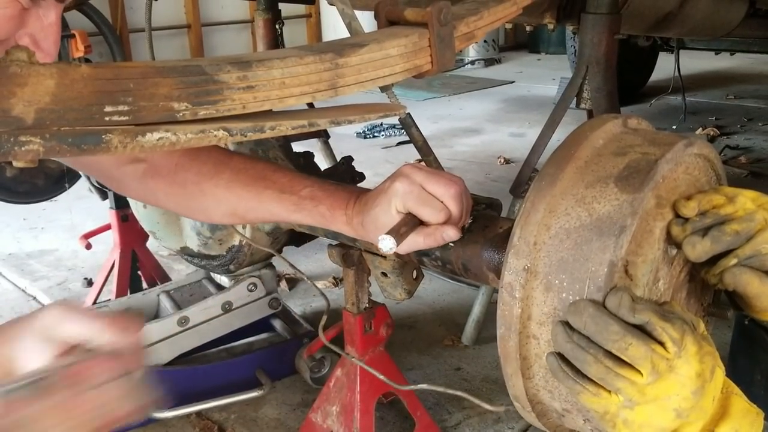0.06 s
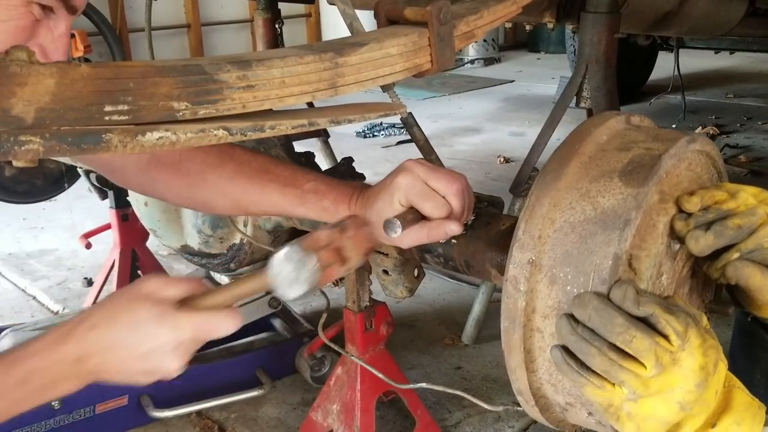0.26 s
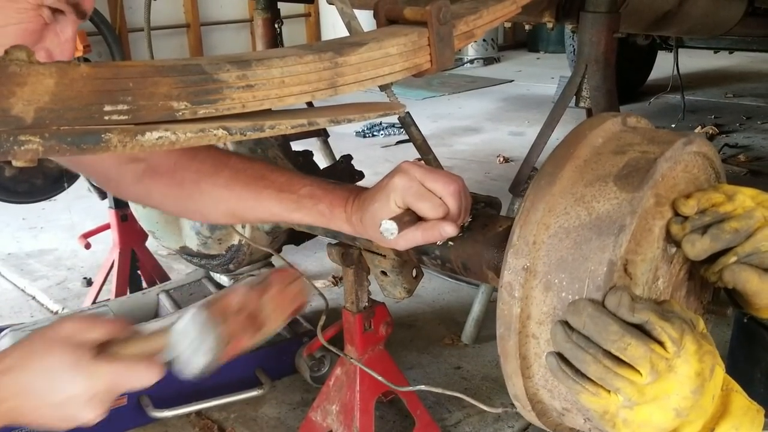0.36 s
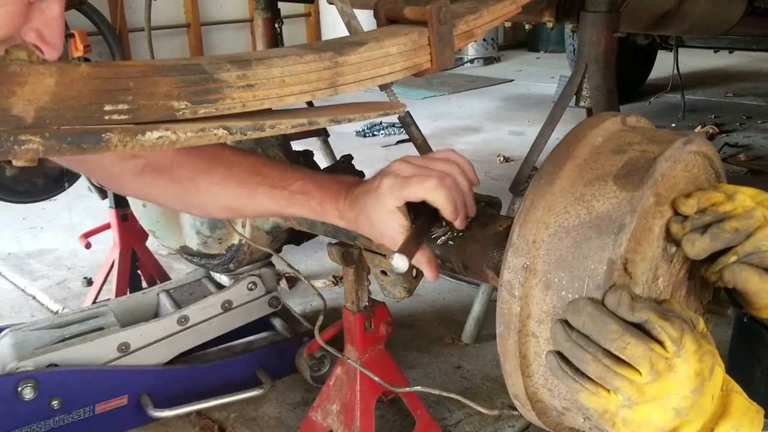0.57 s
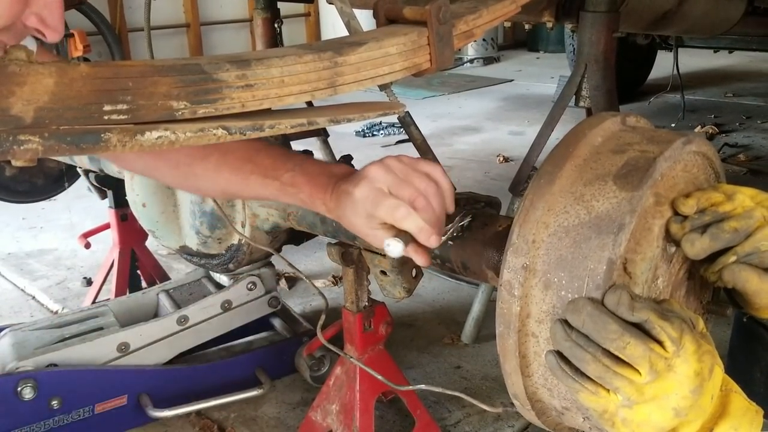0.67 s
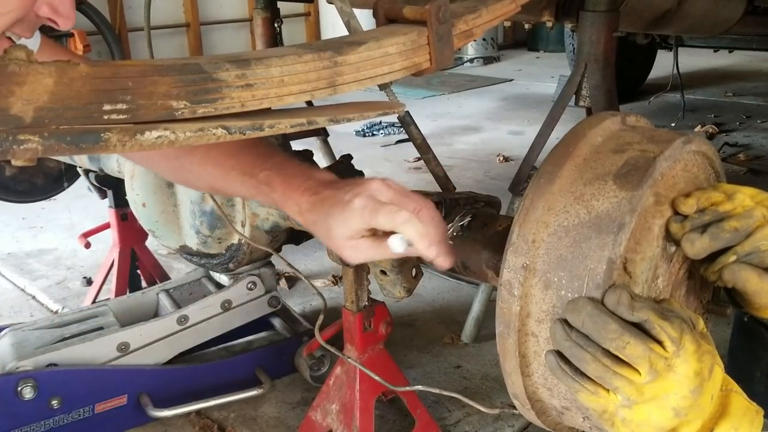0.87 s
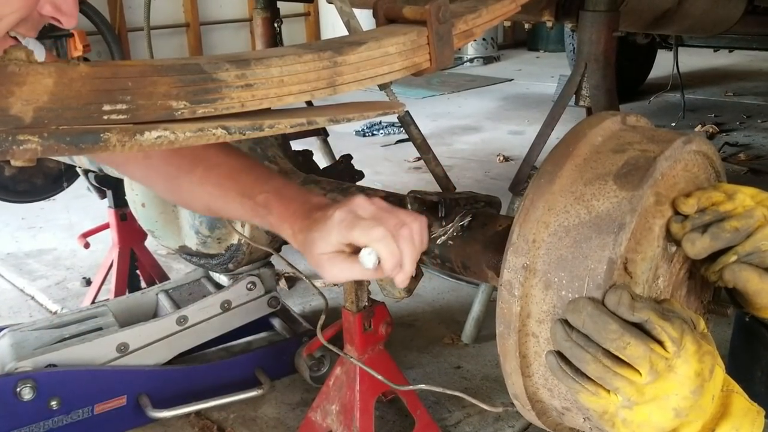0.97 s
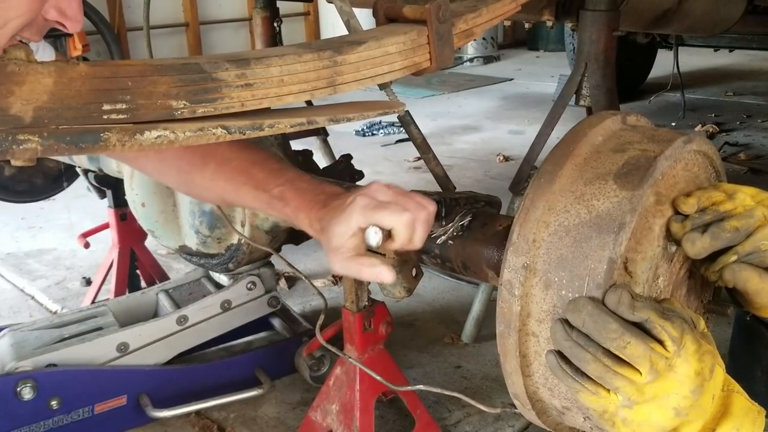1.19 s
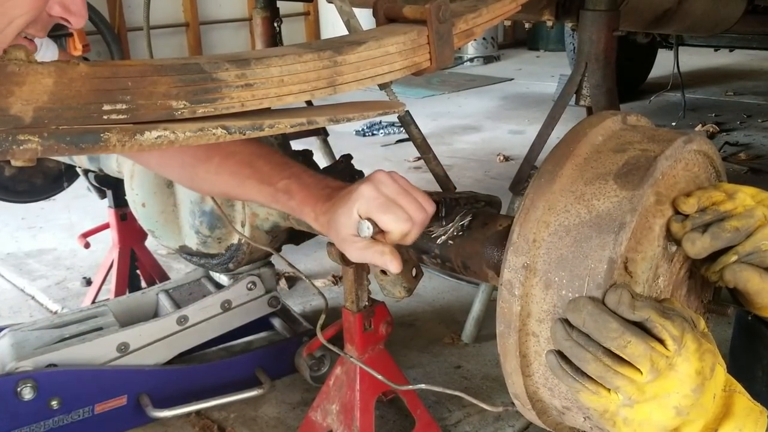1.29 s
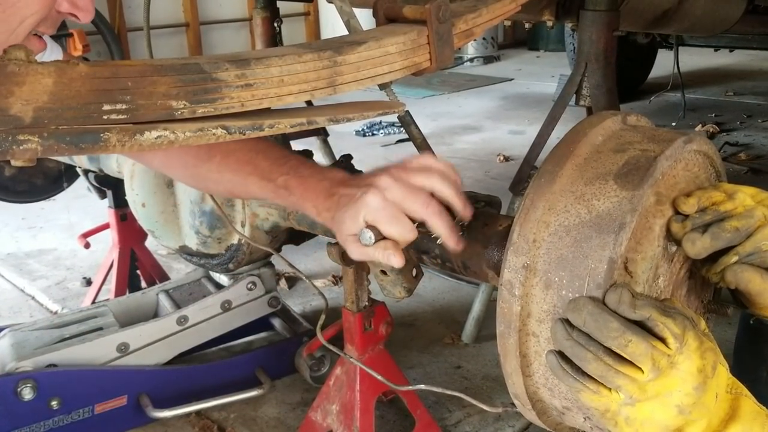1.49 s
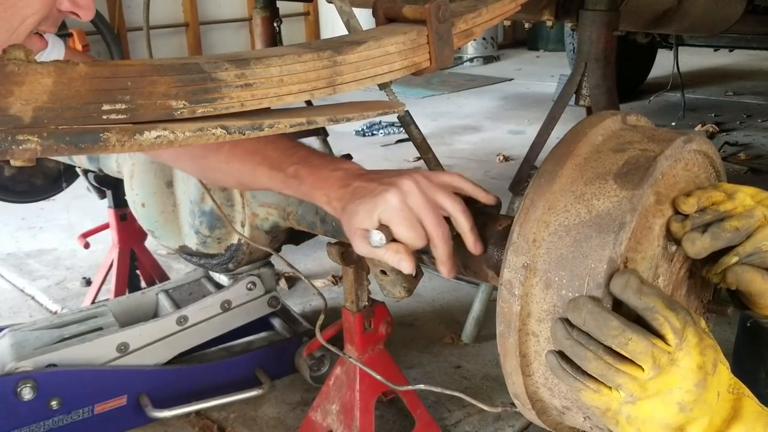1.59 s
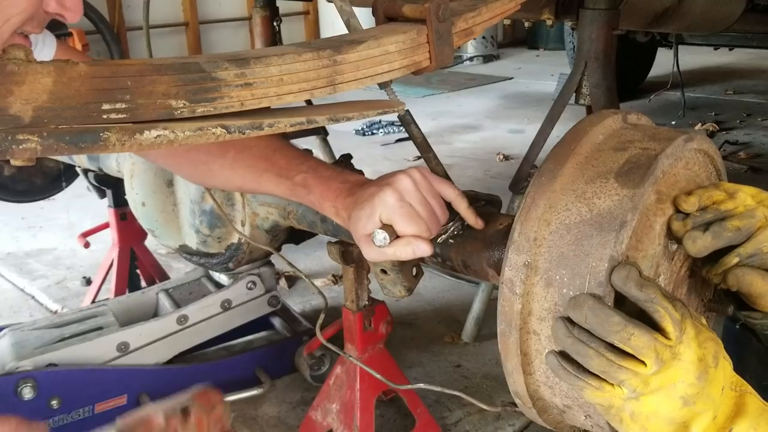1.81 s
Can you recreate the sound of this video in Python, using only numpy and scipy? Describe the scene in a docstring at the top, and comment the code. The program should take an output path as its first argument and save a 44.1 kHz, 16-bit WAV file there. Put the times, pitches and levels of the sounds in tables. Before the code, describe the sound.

A hammer strikes a steel chisel once, a hard bright clang, then light metal knocks follow

```python
"""A quiet garage background of patchy noise rises and falls; the chisel still rings faintly from an earlier blow.
At 0.21 s a hammer drives the chisel hard against a steel axle part: noise cracks and decaying sines, with chatter.
A dense clang of shaped noise dies away; beating sine pairs ring on high and thin until the hand grips the shank.
From 0.68 to 1.32 s the tool is set back in light knocks: short modes, scuffs of noise, choked pings.
Walls and floor answer the steel: single echoes and a dense tail by convolution."""
import sys
import numpy as np
from scipy import signal
from scipy.fft import rfft, irfft
from scipy.io import wavfile
from scipy.ndimage import uniform_filter1d

SR = 44100
rng = np.random.default_rng(int(sys.argv[2]) if len(sys.argv) > 2 else 0)


def gain_from_decibels(decibels):
    """Convert decibel values to linear amplitude factors."""
    exponent = np.asarray(decibels, float) / 20
    return 10 ** exponent


def generate_wav(signal):
    """Clip the signal to [-1, 1] and save it as 16-bit WAV at the path in sys.argv[1]."""
    frames = np.transpose(np.atleast_2d(signal))
    scaled = np.clip(frames, -1, 1) * 32767
    pcm = np.round(scaled).astype(np.int16)
    wavfile.write(sys.argv[1], SR, pcm)


N = 81585
BLOW_S = 0.2108


def evened(x):
    """Scales to rms 1."""
    return x / np.sqrt(np.mean(x ** 2) + 1e-20)


def read(points, hz):
    """Interpolates a table along log frequency."""
    f, value = np.transpose(points)
    return np.interp(np.log(hz + 1), np.log(f + 1), value)


def since(s):
    """Seconds after a moment (0 before it), and a switch that is on from then."""
    t = np.arange(N) / SR - s
    return np.maximum(t, 0), t >= 0


def sides(left_minus_right_db):
    """Left and right gains that split a level difference evenly."""
    return gain_from_decibels([[left_minus_right_db / 2], [-left_minus_right_db / 2]])


def above(x, hz):
    """Third-order high-pass."""
    return signal.sosfilt(signal.butter(3, hz, "high", fs=SR, output="sos"), x)


def ring(s, hz, db, t60, rise_s=0.00087):
    """One mode: an exponentially dying sine with a soft start."""
    t, _ = since(s)
    rise = np.sin(np.pi / 2 * np.minimum(t / rise_s, 1)) ** 2
    return rise * gain_from_decibels(db - 60 * t / t60) * np.sin(2 * np.pi * hz * t)


def burst(s, shape, db, t60):
    """A short puff of coloured noise, half shared between the channels."""
    rise_s = 0.0005
    hz, z = np.fft.rfftfreq(N, 1 / SR), rng.standard_normal((3, N))
    noise = evened(irfft(rfft(z[:2] + z[2]) * gain_from_decibels(read(shape, hz)), N))
    t, on = since(s)
    return noise * on * np.minimum(t / rise_s, 1) * gain_from_decibels(db - 60 * t / t60)


def air():
    """Patchy background noise; over a steady rumble, bass, middle and treble drift on their own."""
    # background spectrum: (frequency [Hz], relative density [dB])
    colour = [(15, -58.5), (25, -31), (43, -15.5), (247, -5.5), (291, -12), (342, 0), (472, -16.5),
              (602, -8), (1470, -21.5), (1770, -11.5), (1970, -18), (2260, -15), (5070, -9), (8020, -22.5),
              (15700, -31.5)]
    # likeness of the channels: (frequency [Hz], correlation [-1 to 1])
    likeness = [(40, 0.92), (80, 1), (240, .8), (950, 0.37), (3770, -0.77), (15000, 1)]
    # background drift: (time [s], bass level [dB], middle level [dB], treble level [dB])
    drift = [(0, -61, -55.5, -68), (0.198, -62, -64.5, -65), (.6, -59, -66, -75.5),
             (.85, -73, -48.5, -80.5), (1.0, -70.5, -49.5, -73.5), (1.1, -76.5, -64.5, -77.5),
             (1.22, -71.5, -67, -85.5), (1.45, -64, -48, -68), (1.6, -57.5, -60, -68.5),
             (1.73, -53.5, -59, -59), (1.781, -59.5, -54.5, -62), (1.85, -54, -55, -57)]
    rumble_hz, bass_hz, middle_hz, treble_hz = 45, 200, 1200, 6000
    rumble_db, patchy_rms_db = -64, 2.2

    frames, hz = N // 256 + 5, np.fft.rfftfreq(1024, 1 / SR)
    a, b, c, d, patches = rng.standard_normal((frames, 513, 5)).T
    patches = uniform_filter1d(patches, size=6, axis=0)  # along frequency
    patches = evened(uniform_filter1d(patches, size=12, axis=1))  # along time

    rows, t = np.transpose(drift), np.arange(frames) * 256 / SR
    bands_db = np.array([rumble_db + 0 * t] + [np.interp(t, rows[0], row) for row in rows[1:]])
    centres_hz = (rumble_hz, bass_hz, middle_hz, treble_hz)
    shares = np.array([read(list(zip(centres_hz, row)), hz) for row in np.identity(n=4)])

    same = np.clip(read(likeness, hz), -1, 1)[:, None]
    left, other = a + 1j * b, c + 1j * d
    right = same * left + np.sqrt(1 - same ** 2) * other
    z = np.array([left, right]) * gain_from_decibels(read(colour, hz)[:, None] + patchy_rms_db * patches)
    flat = signal.istft(z, nperseg=1024, noverlap=768)[1]  # undrifted, sets the reference level
    drifting = signal.istft(z * gain_from_decibels(shares.T @ bands_db), nperseg=1024, noverlap=768)[1]
    return drifting[:, :N] / np.std(flat)


def tones():
    """Faint narrow bands of noise, from twice-smoothed complex noise shifted up, fade in and out."""
    # (frequency [Hz], width of each smoothing pole [Hz], level [dB], start [s], end [s])
    bands = [(1530, 170, -66, .86, 1.097), (1370, 66, -74.5, 0.94, 1.17), (650, 260, -71.5, 0.835, 1.2),
             (440, 35.6, -65.5, 1.55, 1.95), (1360, 90, -66.5, 1.6, 1.84), (1680, 150, -64.5, 1.652, 1.86)]
    fade_s = 0.046
    out, t = np.zeros(N), np.arange(N) / SR
    for hz, width_hz, db, start_s, end_s in bands:
        r, z = np.exp(-np.pi * width_hz / SR), rng.standard_normal((2, N))
        slow = signal.lfilter([1], [1, -r], z[0] + 1j * z[1])
        slow = signal.lfilter([1], [1, -r], slow)
        tone = evened((slow * np.exp(2j * np.pi * hz * t)).real)
        out += gain_from_decibels(db) * np.clip(np.minimum(t - start_s, end_s - t) / fade_s, 0, 1) * tone
    return out


def garage(x):
    """Walls and floor: a few single echoes and a dense tail that builds up and dies by band."""
    # first echoes: (delay [s], left level [dB], right level [dB])
    echoes = [(.0045, -14.5, -10.5), (.0075, -9, -11.5), (.011, -15.5, -17.5), (.016, -13.5, -14.5)]
    # decay of the tail: (frequency [Hz], t60 [s])
    decay = [(200, 1), (700, 0.72), (1500, 0.46), (3000, 0.44), (6000, 0.5), (9000, 0.14), (15000, .2)]
    tail_db, build_s = -12, 0.004

    taps = np.zeros((2, SR))
    at = np.arange(100, SR - 20, 20) + rng.integers(0, 20, (2, (SR - 101) // 20))
    np.put_along_axis(taps, at, rng.choice([-1., 1.], at.shape), 1)
    hz, t, z = signal.stft(taps, SR, nperseg=256)
    tail = signal.istft(z * gain_from_decibels(-60 * t / read(decay, hz)[:, None]), SR, nperseg=256)[1][:, :SR]
    tail = tail * np.minimum(np.arange(SR) / SR / build_s, 1)
    response = gain_from_decibels(tail_db) * tail / np.linalg.norm(tail[0])
    for k, (delay_s, left_db, right_db) in enumerate(echoes):
        response[:, round(delay_s * SR)] += (-1) ** k * gain_from_decibels([left_db, right_db])
    return signal.fftconvolve(x, response, axes=1)[:, :N]


def knock(s, db, spot, ping_db, lasts_s, scuff_db, rise_s):
    """A light contact: modes of the part and a scuff; apart, the ping of the tool until the grip chokes it."""
    # modes: (frequency [Hz], level at the heavy end [dB], level at the light end [dB], t60 [s])
    part = [(625, -16, -14.5, 0.31), (988.5, 4.5, -26.5, 0.091), (1281, -11.5, -13, 0.09),
            (1710, 6.5, -29, 0.052), (1978, -4, -4.5, 0.33), (2141, -6, 3.5, 0.079),
            (2570, -28.5, -2, 0.46), (3080, 1.5, -6, 0.083), (3240, -4.5, 3, 0.081), (3500, -33, -3, 0.4),
            (3900, -21, 9.5, 0.035), (3910, -12.5, -6, 0.15), (4500, -40.5, 8, 0.069),
            (6010, -37, 1.5, 0.023)]
    # scuff spectrum: (frequency [Hz], relative density [dB per Hz])
    scuff_shape = [(180, -56), (300, -24.5), (955, -17), (3630, -10), (4400, -7.5), (5170, -22),
                   (9070, -44.5), (11500, -42), (14000, -63)]
    scuff_t60_s = 0.079
    free_s, settle_s, settle_db = 0.02, 0.005, -4  # rings freely, then settles and loses strength
    ping_hz, ping_t60_s = 4384.5, 0.9
    partner_hz, partner_gain, choked_t60_s = 4550, 0.14, 0.12

    modes = np.zeros(N)
    for sign, (hz, heavy_db, light_db, t60) in zip(rng.choice([-1., 1.], len(part)), part):
        modes += sign * ring(s, hz, heavy_db + spot * (light_db - heavy_db), t60, rise_s)
    modes = modes * gain_from_decibels(settle_db * np.minimum(since(s + free_s)[0] / settle_s, 1))
    scuff = np.minimum(since(s)[0] / rise_s, 1) * burst(s, scuff_shape, scuff_db, scuff_t60_s)

    ping = ring(s, ping_hz, ping_db, ping_t60_s, rise_s)
    ping = ping + partner_gain * ring(s, partner_hz, ping_db, choked_t60_s, rise_s)
    ping = ping * gain_from_decibels(-60 * since(s + lasts_s)[0] / choked_t60_s)
    return gain_from_decibels(db) * np.array([modes + scuff, [ping, ping]])


def light_knocks():
    """The tool set back against the part: all contacts, with the pings apart, without the lows."""
    # (time [s], level [dB], spot [0 heavy end to 1 light end], shank ping [dB re level],
    #  ping lasts [s], scuff [dB re level], rise [s])
    contacts = [(.678, -57.5, 0, -1, 0.21, -15, 0.0018), (0.749, -41, 0.24, -15, 0.089, -7, 0.0009),
                (.808, -49, 0.18, -20, 0.034, -0.5, 0.0018), (.92, -50, 0.32, -7, 0.051, -11, 0.0014),
                (1.01, -66, 0.23, -11, 0.061, -10, 0.004), (1.257, -36.5, 0.86, 5.5, 0.015, 4.5, 0.0056),
                (1.269, -38.5, 0.15, -0.5, 0.026, 8.5, 0.0014), (1.318, -39.5, 1, -4.5, 0.01, 6.5, 0.0059)]
    low_hz = 420
    return above(sum(knock(*row) for row in contacts), low_hz)


def frame():
    """Long rings of the frame that outlast the clang, with unlike phases in the two channels."""
    # (frequency [Hz], level [dB], t60 [s])
    modes = [(2629.6, -47.5, 0.68), (2980, -43.5, 0.79), (3072, -49, .6), (3200, -44, 1), (3150, -44, .55),
             (3251, -43, 0.31), (4670, -44.5, .35)]
    rise_s = 0.014
    t, phases = since(BLOW_S)[0], 2 * np.pi * rng.random((len(modes), 2, 1))
    rings = sum(gain_from_decibels(db - 60 * t / t60) * np.sin(2 * np.pi * hz * t + phase)
                for (hz, db, t60), phase in zip(modes, phases))
    return np.minimum(t / rise_s, 1) * rings


def wash():
    """Dense clang of the frame: so many modes that they blur to noise, each band dying at its own speed."""
    # clang spectrum: (frequency [Hz], relative density [dB per Hz])
    shape = [(88, -52.5), (150, -26.5), (248, -11.5), (1220, -23), (1830, -18), (2180, -10), (2410, -13),
             (3350, -2.5), (8170, -31.5), (11800, -15), (15500, -57)]
    # clang decay: (frequency [Hz], t60 [s])
    decay = [(300, 0.53), (1000, 1), (3000, .7), (6000, .5), (10000, .4), (14000, 0.29)]
    level_db, rise_s = -30.5, 0.0067
    hz, t, z = signal.stft(rng.standard_normal((2, N)), SR, nperseg=256)
    colour = gain_from_decibels(read(shape, hz))[:, None]
    z = z * colour / np.sqrt(np.mean(colour ** 2))
    z = z * gain_from_decibels(-60 * np.maximum(t - BLOW_S, 0) / read(decay, hz)[:, None])
    clang = signal.istft(z, SR, nperseg=256)[1][:, :N]
    return gain_from_decibels(level_db) * np.minimum(since(BLOW_S)[0] / rise_s, 1) * clang


def shank():
    """Free ringing of the chisel: close mode pairs beat, an earlier blow lingers, the hand closes on it."""
    # (centre frequency [Hz], level [dB], t60 before the grip [s], beat [Hz])
    modes = [(7640, -56, .8, 14), (11430, -35, 0.69, 16), (15400, -66.5, .6, 16)]
    earlier_blow_s, earlier_db = -0.42, -9
    build_s, free_s, gripped_t60_s = 0.22, 0.35, 0.82
    out = np.zeros(N)
    for s, blow_db in ((earlier_blow_s, earlier_db), (BLOW_S, 0)):
        build = np.minimum(since(s)[0] / build_s, 1)
        for hz, db, t60, beat_hz in modes:
            upper = ring(s, hz + beat_hz / 2, db + blow_db, t60)
            lower = ring(s, hz - beat_hz / 2, db + blow_db, t60)
            out += build * (upper + 0.6 * lower)
    return out * gain_from_decibels(-60 * since(BLOW_S + free_s)[0] / gripped_t60_s)


def face():
    """The struck face sings a short loud tone, held until the contact chokes it."""
    tone_hz, level_db, left_db = 3966, -1, -10.5
    rise_s, hold_s, t60_s = 0.0004, 0.0045, 0.004
    t, on = since(BLOW_S)
    level = np.minimum(t / rise_s, 1) * gain_from_decibels(level_db - 60 * np.maximum(t - hold_s, 0) / t60_s)
    return gain_from_decibels([[left_db], [0]]) * on * level * np.sin(2 * np.pi * tone_hz * t)


def blow():
    """The blow and the chisel's chatter after it: every contact cracks and rings the modes of the axle."""
    # (time [s], modes level [dB], crack level [dB], left minus right [dB])
    contacts = [(.2108, -12, -16, 2), (.2148, -26.5, -12.5, 0), (.2185, -17, -7.5, -2.5),
                (.2222, -10, -11, 2.5), (.2285, -23.5, -23, -5.5), (.2355, -21, -25, 1.5)]
    # axle and chisel modes: (frequency [Hz], level re contact [dB], t60 before the cap [s],
    #  left minus right [dB])
    axle = [(254, -37, .4, 0), (641, -26.5, 0.25, 2.5), (695, -16.5, 0.054, -1.5), (979.5, -31.5, 0.21, 13),
            (1462, -20.5, 0.3, -0.5), (2300, -22.5, 0.33, 0.5), (2165, -21, 0.19, 4.5),
            (2690, -14.5, 0.25, 10.5), (3390, -13.5, 0.14, 0.5), (3740, -28.5, 0.046, 9),
            (3827, -13, 0.049, -2), (3850, -10.5, 0.033, -5), (3940, -11.5, .1, -2.5), (4410, -10, 0.3, -1),
            (5066, -17.5, 0.15, -3.5), (10200, -11, 0.014, 6)]
    # crack spectrum: (frequency [Hz], relative density [dB per Hz])
    crack_shape = [(59, -54), (100, -38), (923, -14), (1190, -9), (1320, -10), (1470, -10), (1980, -9.5),
                   (3430, 2), (7990, -18), (10700, -12.5), (15700, -21)]
    crack_t60_s, low_hz = 0.057, 193
    most_cycles = 380  # caps the t60 of every mode
    out = np.zeros((2, N))
    for s, modes_db, crack_db, side_db in contacts:
        modes = np.zeros((2, N))
        for k, (hz, db, t60, pan_db) in enumerate(axle):
            mode = ring(s, hz, db + modes_db, min(t60, most_cycles / hz))
            modes += (-1) ** k * sides(pan_db) * mode
        out += sides(side_db) * (modes + burst(s, crack_shape, crack_db, crack_t60_s))
    return above(out, low_hz)


def scene():
    """Steel near the microphones, its echoes, the background."""
    face_echo_db, knock_echo_db, ping_echo_db = -9, 1.5, -10
    hit, sung = blow(), face()
    knocks, pings = light_knocks()
    to_room = hit + gain_from_decibels(face_echo_db) * sung + gain_from_decibels(knock_echo_db) * knocks + gain_from_decibels(ping_echo_db) * pings
    steel = hit + sung + knocks + pings + wash() + frame() + shank()
    return steel + garage(to_room) + air() + tones()


def roll_off(x):
    """The treble ends steeply here."""
    return signal.sosfilt(signal.butter(12, 15880, fs=SR, output="sos"), x)


def record(dry):
    """The right port hears a little later, by a phase slope; the highest peaks clip."""
    right_lag_s = 0.00017
    lag = np.exp(-2j * np.pi * np.fft.rfftfreq(N, 1 / SR) * np.array([[0], [right_lag_s]]))
    mix = np.clip(irfft(rfft(dry) * lag, N), -1, 1)
    return roll_off(mix)


dry = scene()
out = record(dry)
generate_wav(out)
```